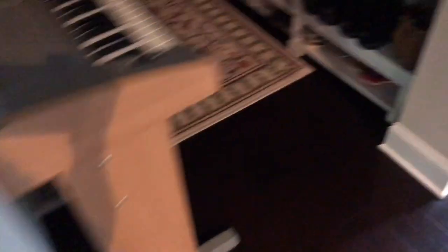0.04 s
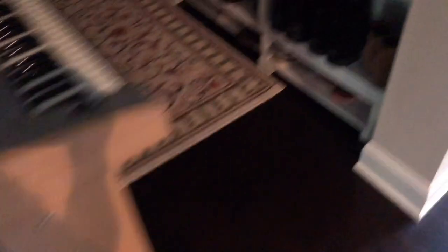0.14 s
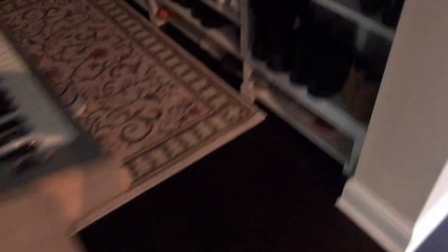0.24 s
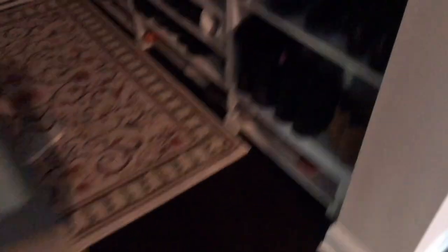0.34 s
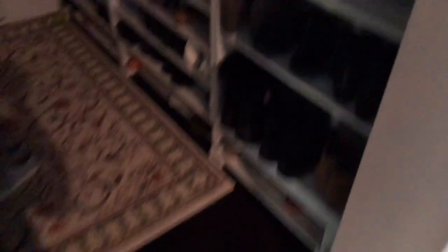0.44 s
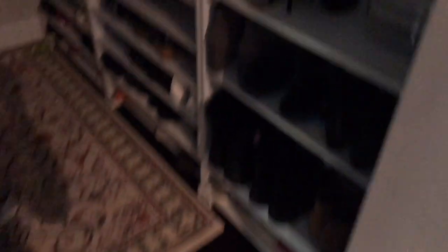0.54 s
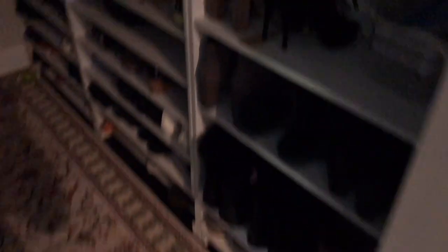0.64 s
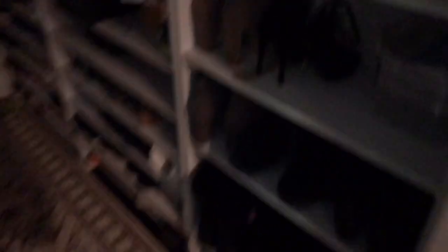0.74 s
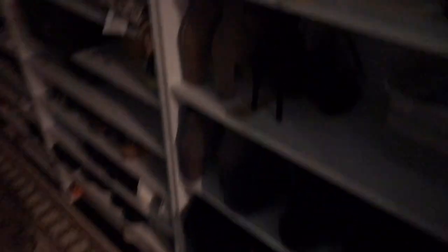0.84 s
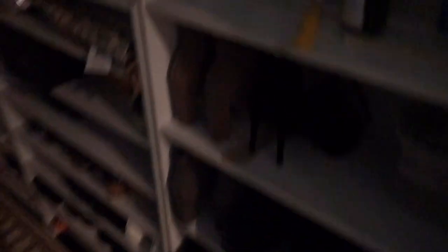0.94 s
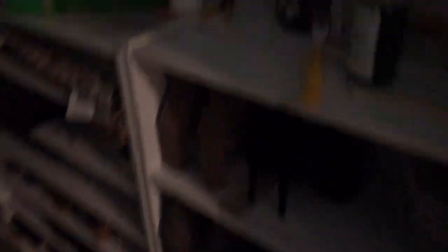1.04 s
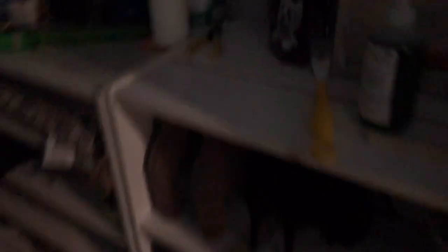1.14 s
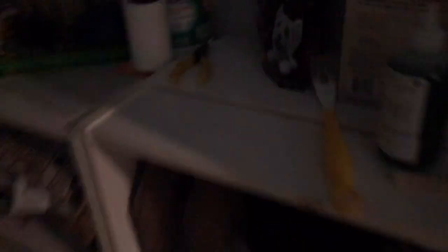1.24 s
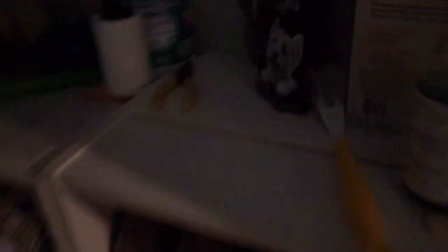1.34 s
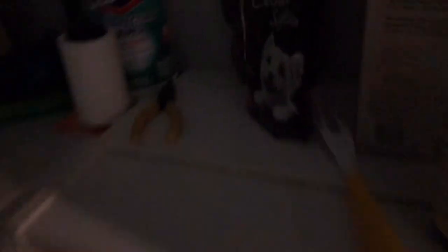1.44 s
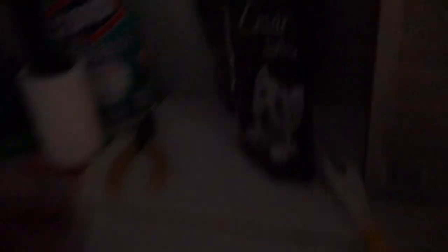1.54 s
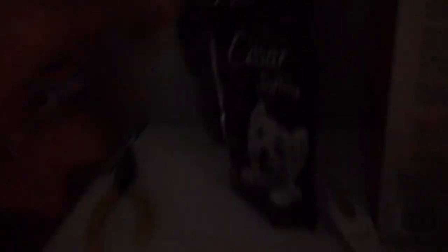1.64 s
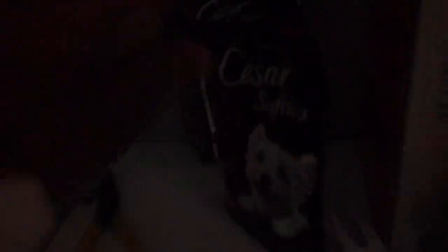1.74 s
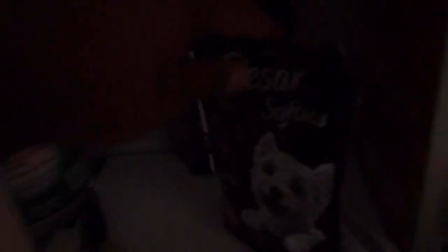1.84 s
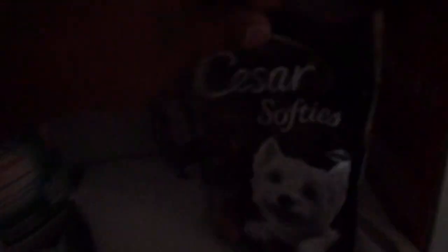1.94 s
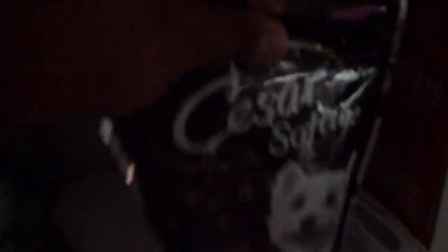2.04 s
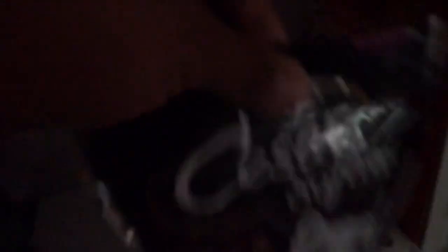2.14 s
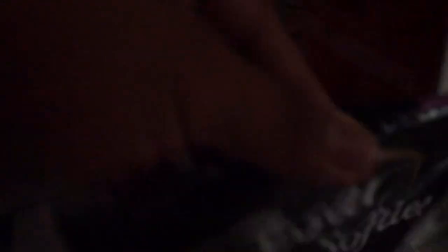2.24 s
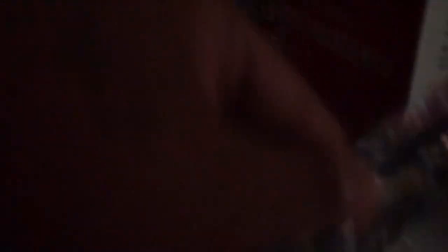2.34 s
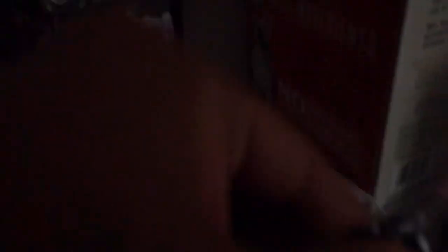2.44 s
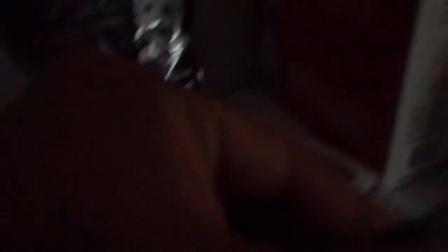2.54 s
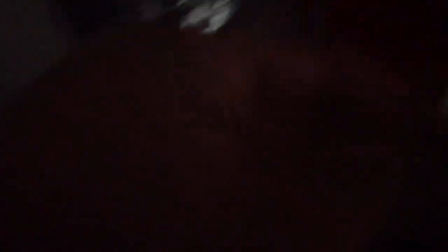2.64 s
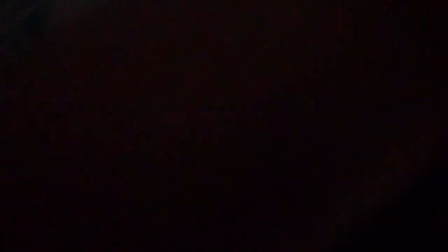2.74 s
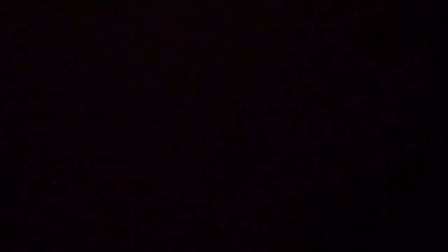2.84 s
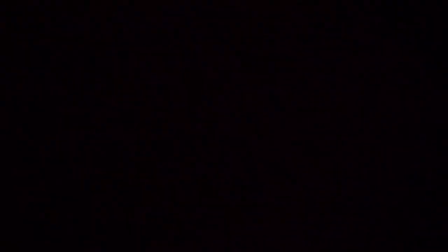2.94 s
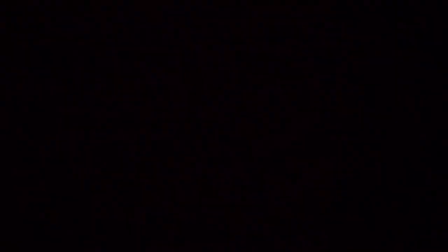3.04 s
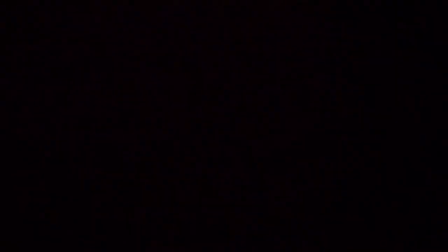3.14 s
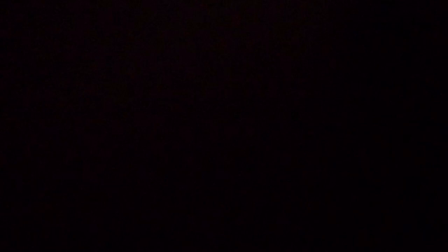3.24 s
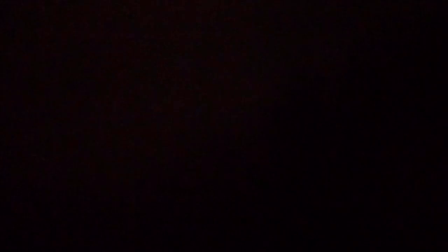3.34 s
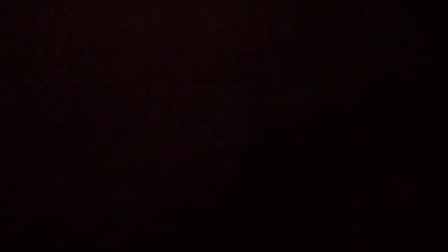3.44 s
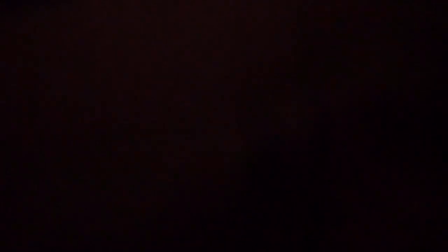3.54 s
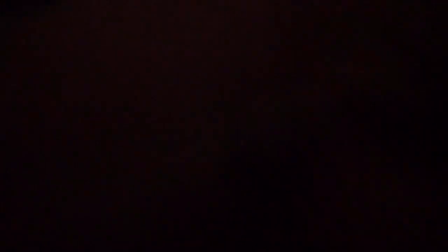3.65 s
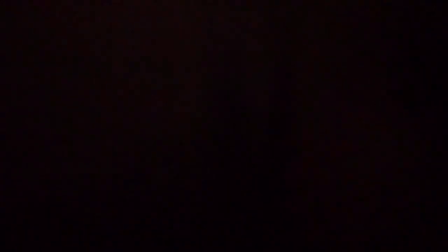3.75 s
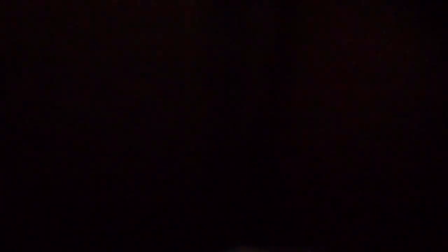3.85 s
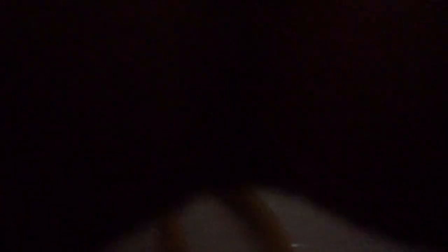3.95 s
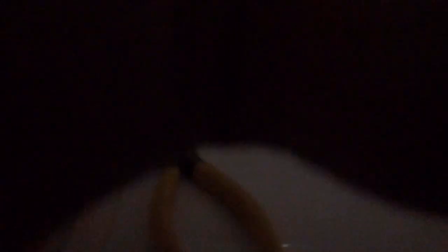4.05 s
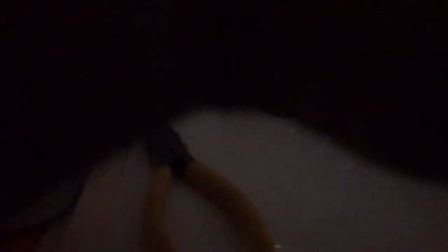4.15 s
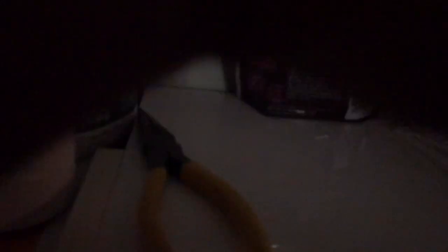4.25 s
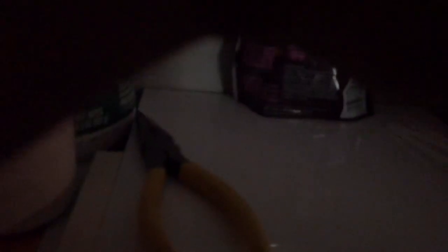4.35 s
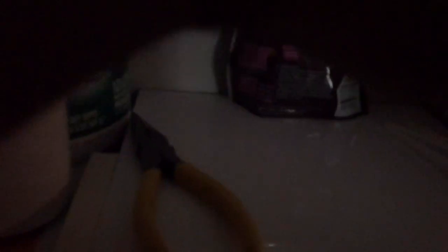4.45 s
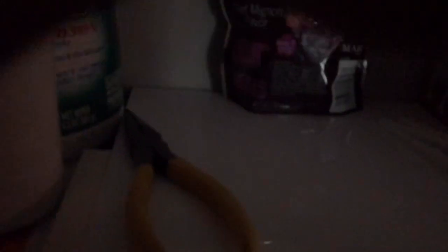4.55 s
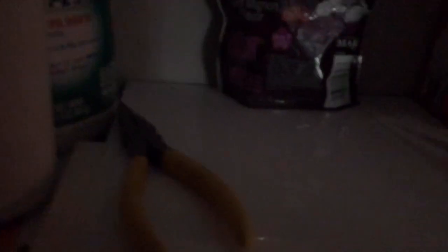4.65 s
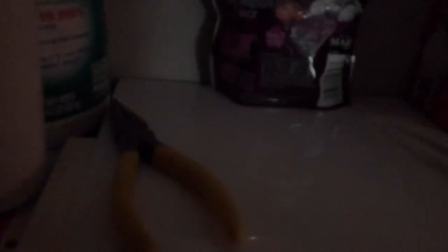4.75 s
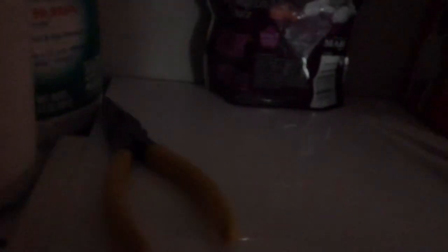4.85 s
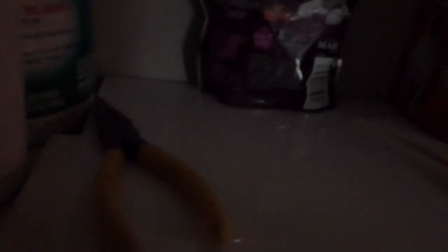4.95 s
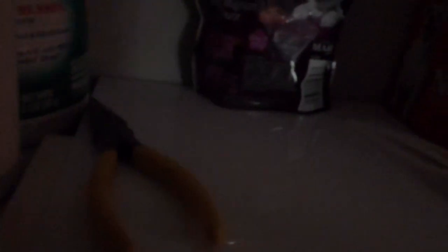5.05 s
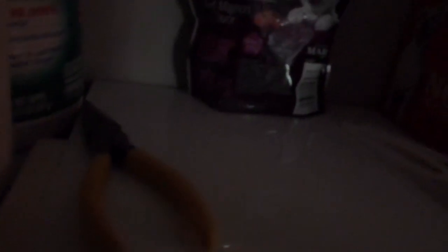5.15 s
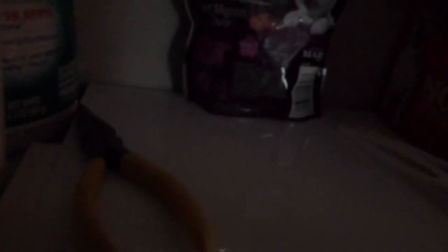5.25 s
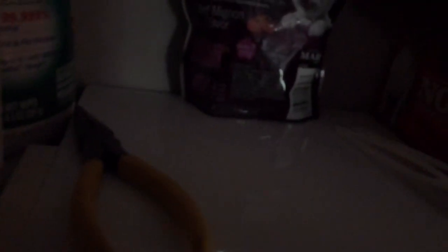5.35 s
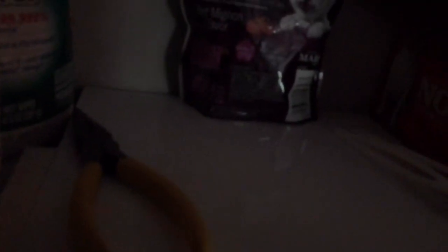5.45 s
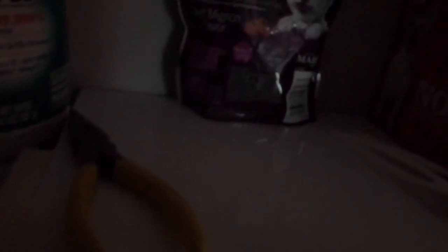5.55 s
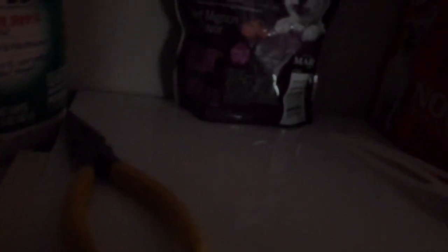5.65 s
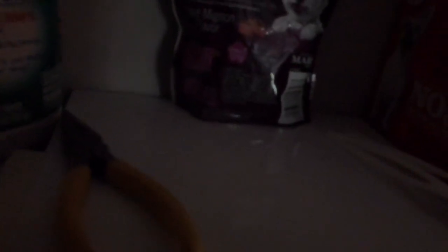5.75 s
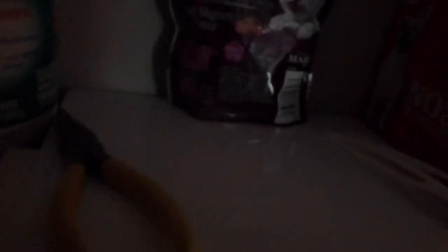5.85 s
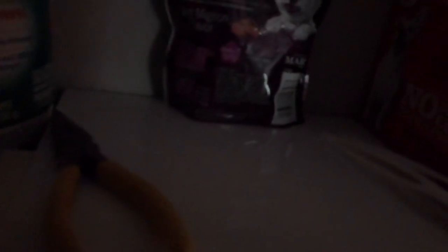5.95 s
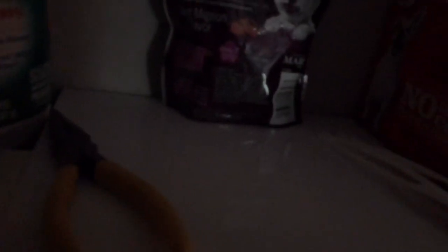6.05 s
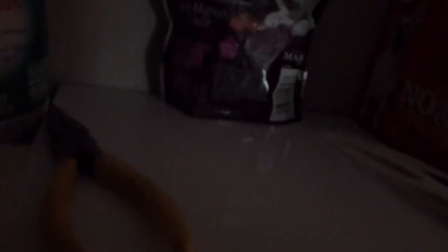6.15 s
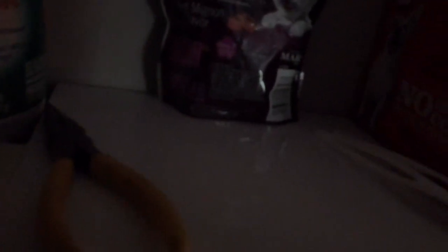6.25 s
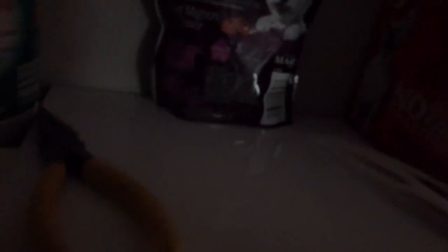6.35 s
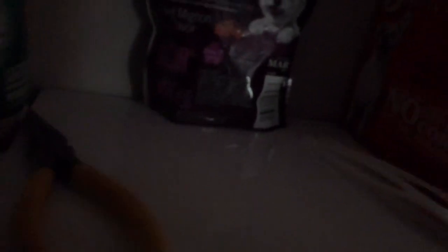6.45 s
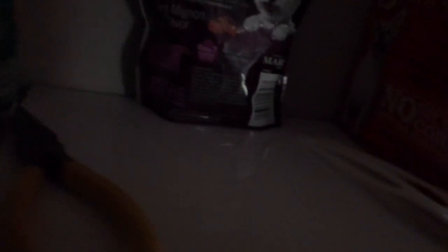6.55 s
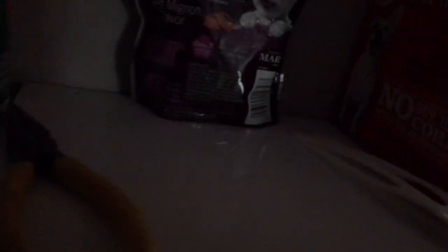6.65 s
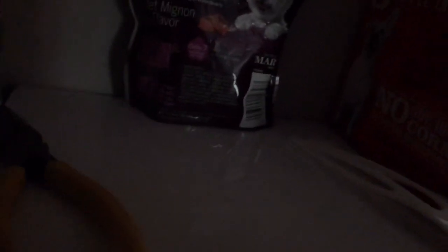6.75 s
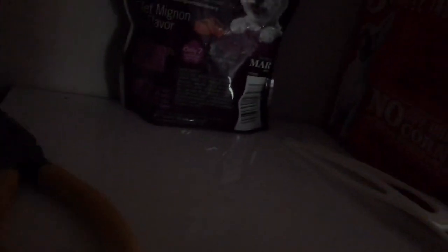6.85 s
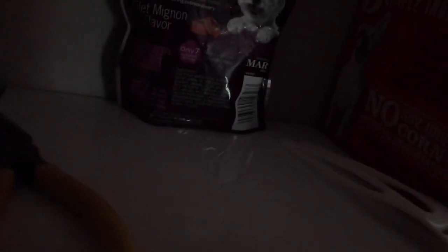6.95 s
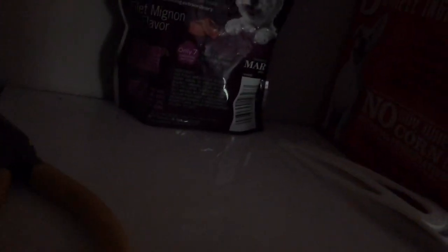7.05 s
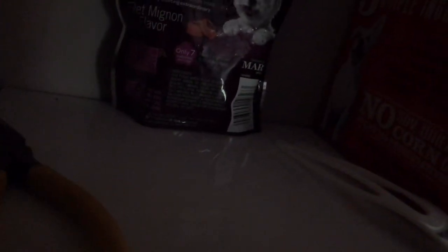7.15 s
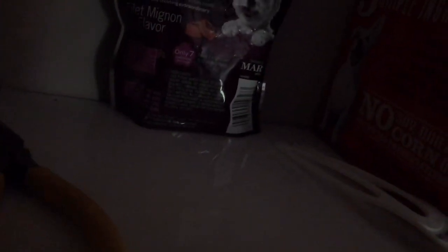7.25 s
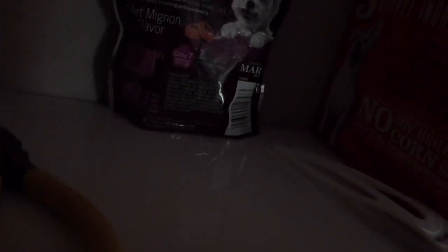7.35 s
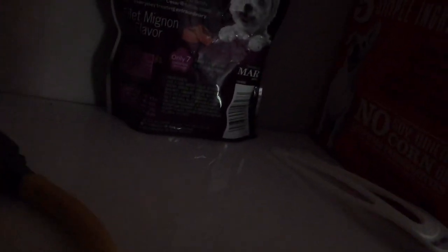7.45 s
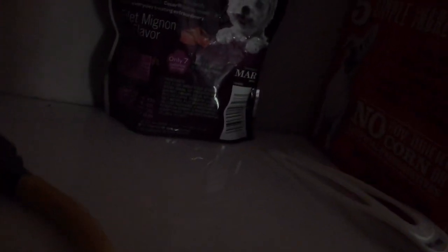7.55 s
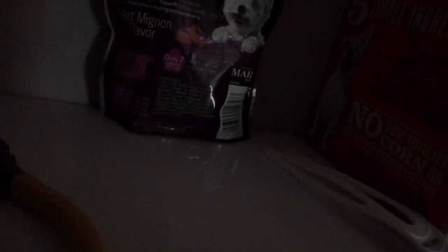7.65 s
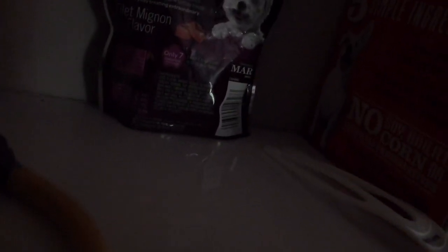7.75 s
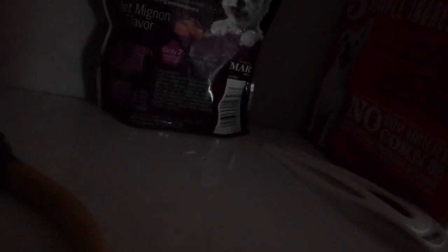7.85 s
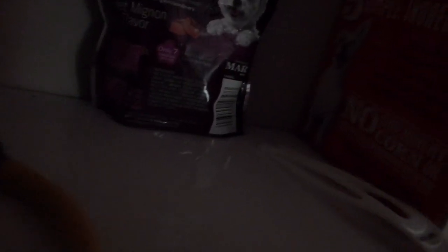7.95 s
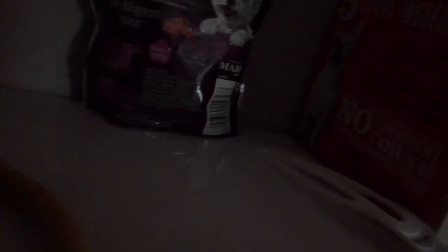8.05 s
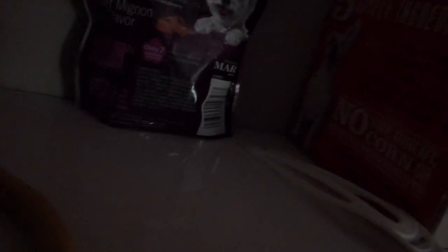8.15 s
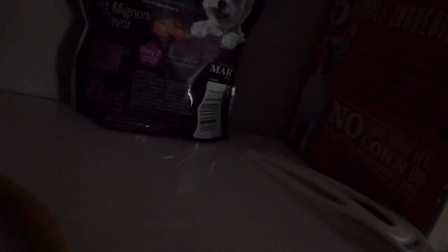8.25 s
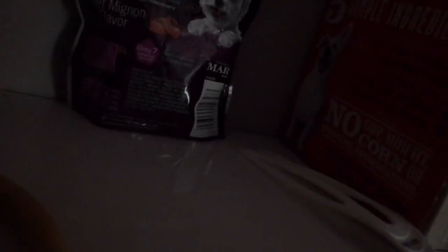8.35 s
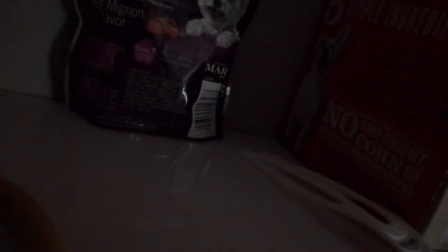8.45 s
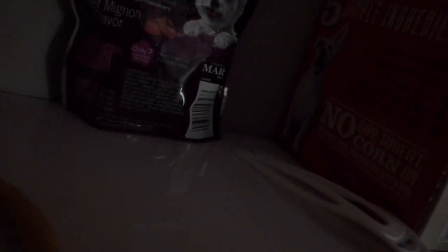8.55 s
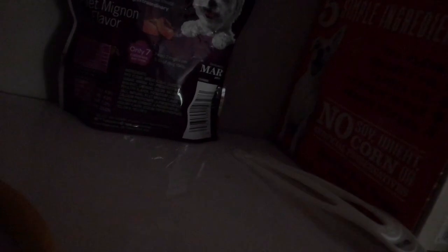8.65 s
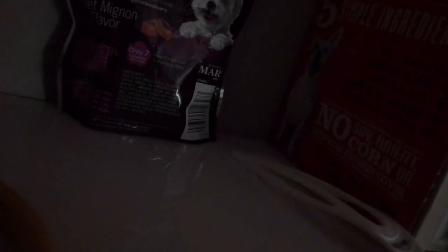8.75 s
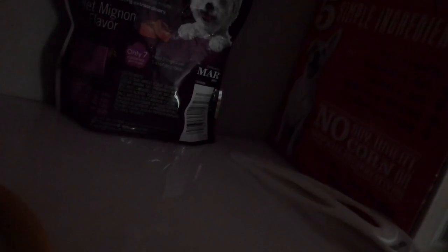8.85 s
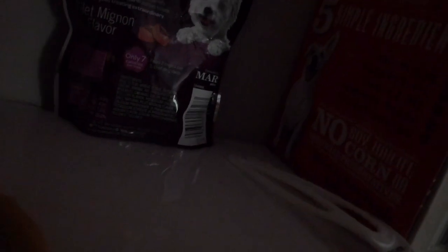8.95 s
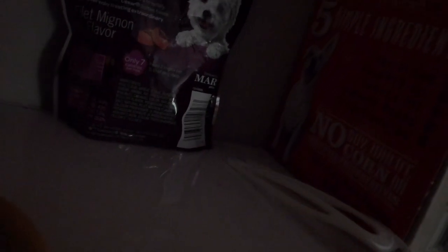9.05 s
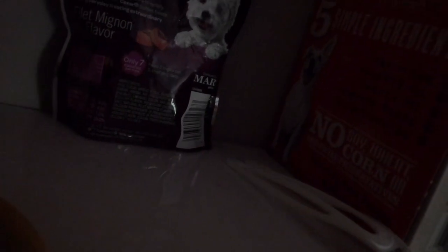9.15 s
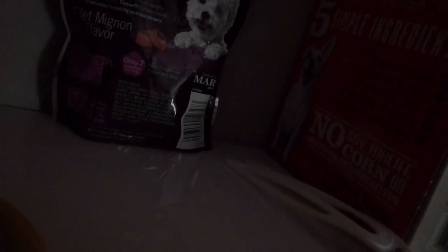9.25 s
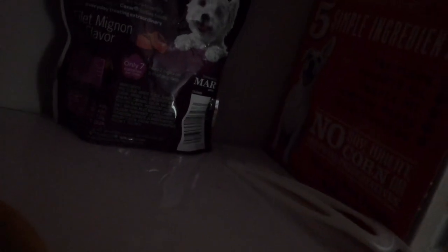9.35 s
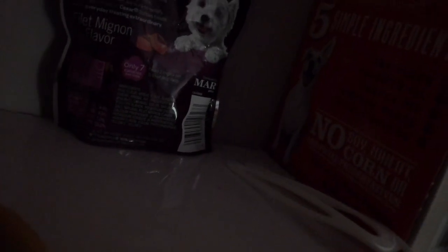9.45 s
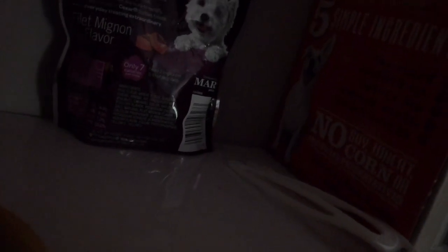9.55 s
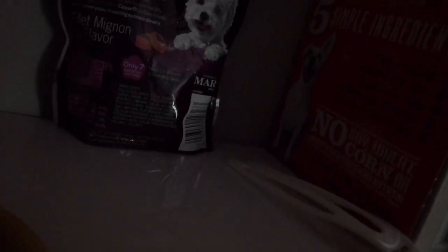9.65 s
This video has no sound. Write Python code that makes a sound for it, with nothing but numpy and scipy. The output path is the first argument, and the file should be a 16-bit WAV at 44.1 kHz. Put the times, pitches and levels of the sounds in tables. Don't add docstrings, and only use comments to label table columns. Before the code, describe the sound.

Quiet indoor air and one far slap, then close dense crinkling of a treat pouch, thinning to scattered crackles and soft bumps.

```python
import sys
import numpy as np
from scipy import signal
from scipy.fft import rfft, irfft, next_fast_len
from scipy.io import wavfile
from scipy.ndimage import uniform_filter1d, map_coordinates

SR = 44100
rng = np.random.default_rng(int(sys.argv[2]) if len(sys.argv) > 2 else 0)


def file_out(sig):
    cols = np.atleast_2d(sig).T
    lim = np.clip(cols, -1, 1)
    pcm = np.round(lim * 32767).astype(np.int16)
    wavfile.write(sys.argv[1], SR, pcm)


def level_to_linear(level):
    exponent = np.asarray(level, float) / 20
    return 10 ** exponent


N = 427769


def unit(x):
    return x / np.sqrt(np.mean(x ** 2, axis=-1, keepdims=True) + 1e-20)


def peak(x):
    return x / np.abs(x).max(axis=-1, keepdims=True)


def along(points, hz):
    f, v = np.transpose(points)
    return np.interp(np.log(hz + 1), np.log(f + 1), v)


def wobble(rate):
    knots = rng.standard_normal(int(N * rate / SR) + 4)
    return map_coordinates(knots, [np.arange(N) * rate / SR])


def filtered(x, response):
    m = next_fast_len(x.shape[-1] + 4096)
    return irfft(rfft(x, m) * response(np.fft.rfftfreq(m, 1 / SR)), m)[..., :x.shape[-1]]


def place(s, rows):
    where = np.round(s * SR).astype(int) + np.arange(rows.shape[1])
    return np.bincount(where.ravel(), rows.ravel(), N + rows.shape[1])[:N]


def resonance(f, hz, width_hz):
    return 1j * f * width_hz / (hz * hz - f * f + 1j * f * width_hz + 1e-9)


def tail(decays, seconds):
    hz, t, z = signal.stft(rng.standard_normal(int(seconds * SR)), SR, nperseg=128)
    decay = level_to_linear(-60 * t / along(decays, hz)[:, None])
    x = signal.istft(z * decay, SR, nperseg=128)[1]
    return x / np.linalg.norm(x)


def grains(per_second, clump_db):
    hit = rng.random(N) < per_second / SR
    uneven_db = 2 * np.minimum(rng.exponential(size=N), 3)
    size = level_to_linear(uneven_db + clump_db * (wobble(60) + wobble(12)))
    return unit(hit * size * rng.standard_normal(N))


def patchy(x, depth_db):
    z = signal.stft(x, nperseg=256)[2]
    field = uniform_filter1d(rng.standard_normal(z.shape), size=9, axis=0)
    field = uniform_filter1d(field, size=14, axis=1)
    return unit(signal.istft(z * level_to_linear(depth_db * field / field.std()), nperseg=256)[1][:N])


# f/Hz, density/(dB per Hz)
AIR_SPECTRUM = [(25, -16), (55, 5), (150, -2), (900, -14.5), (3000, -17), (8000, -24), (16000, -46.5)]
# t/s, level/dB, half length/s
STRIDES = [
    (.69, -68, 0.037),
    (0.86, -66, 0.11),
    (1.44, -63.5, 0.16),
]


def background():
    noise = rng.standard_normal((3, N))
    air = patchy(filtered(noise[0], lambda f: level_to_linear(along(AIR_SPECTRUM, f))), depth_db=1.2)
    rumble = unit(filtered(noise[1], lambda f: resonance(f, 53, 29) ** 2))
    cloth = unit(filtered(noise[2], lambda f: resonance(f, 11000, 25000)))
    t = np.arange(N) / SR
    brush = level_to_linear(-75.5) + sum(level_to_linear(db) * np.exp(-((t - s) / half) ** 2) for s, db, half in STRIDES)
    return level_to_linear(-62.5) * air + level_to_linear(-66.5) * rumble + brush * cloth


def hum():
    t = np.arange(N) / SR
    fade_s = 1.6
    level_db = -62 - 12 * (1 - np.exp(-t / fade_s)) + 1.5 * wobble(6.6)
    hz = 53.8 + 1.8 * wobble(5.6)
    return level_to_linear(level_db) * np.sin(2 * np.pi * np.cumsum(hz) / SR)


# f/Hz, density/(dB per Hz)
SLAP_SPECTRUM = [(35, -18.5), (70, 11.5), (110, -11.5), (200, 0), (330, -9), (3500, -13), (8000, -13.5),
                 (16000, -7.5)]
# f/Hz, bandwidth/Hz, level/dB
SLAP_MODES = [
    (530, 135, 2.5),
    (1350, 58, 4.5),
    (2300, 190, -6),
    (7800, 1600, -9.5),
]
# f/Hz, decay by 60 dB/s
HALL_DECAY = [(70, 1), (1400, 1.23), (7000, 0.87), (15000, 0.37)]


def slap():
    ring = np.zeros(N + 2 * SR)
    for s, db in [(.081, -3.5), (.222, -10.5)]:
        decay = tail(HALL_DECAY, 1.7)
        t = np.arange(len(decay)) / SR
        onset = (1 - np.exp(-t / 0.011)) * (1 + 0.9 * np.exp(-t / 0.0086))
        ring[round(s * SR):][:len(t)] += level_to_linear(db) * decay * onset
    modes = lambda f: 1 + sum(level_to_linear(db + 5) * np.abs(resonance(f, hz, w)) for hz, w, db in SLAP_MODES)
    late = lambda f: np.exp(-2j * np.pi * f * 0.026 / (1 + (f / 300) ** 2))
    body = unit(filtered(ring[:N], lambda f: late(f) * modes(f) * level_to_linear(along(SLAP_SPECTRUM, f))))
    start_s, length_s = .088, .018
    t = np.arange(N) / SR - start_s
    gate = np.clip(t / .003, 0, 1) * np.exp(-np.clip(t - length_s, 0, 1) / .008)
    spray = unit(filtered(grains(9000, clump_db=-0.5), lambda f: resonance(f, 10000, 9000)))
    return level_to_linear(-49.5) * body + level_to_linear(-30) * gate * spray


# f/Hz, bandwidth/Hz, level/dB
POUCH_MODES = [
    (144, 90, 1.5),
    (330, 170, -1.5),
    (480, 86, 1.5),
    (833, 240, -28.5),
]


def pouch(f):
    modes = sum((-1) ** k * level_to_linear(db) * resonance(f, hz, w) for k, (hz, w, db) in enumerate(POUCH_MODES))
    return modes * 1j * f / (150 + 1j * f)


def crease(f, hz, skirt=0.52):
    colour = resonance(f, hz, 0.21 * hz) + skirt * resonance(f, .5 * hz, 1.8 * hz)
    return colour / (1 - (f / hz / 2) ** 2 + 1j * f / hz / 0.88)


def panels(rows, depth_db):
    ripple = unit(uniform_filter1d(rng.standard_normal((rows, 220)), size=7))
    return lambda f: level_to_linear(depth_db * ripple[:, (f // 101).astype(int)])


def snaps(rows, skirt):
    s, db, hz, ms, thump_db, top_db = np.transpose(rows)[:, :, None]
    thump_db = thump_db - 0.24 * (db + 24.5)
    t = np.arange(2560) / SR / (np.clip(ms, 1, 20) / 1000)
    envelope = (1 - np.exp(-t / 0.072)) * (np.exp(-1.6 * t ** 2) + 0.13 * np.exp(-.8 * t))
    head = np.arange(2560) / SR * 1000 / .45
    envelope = envelope + 0.94 * head * np.exp(1 - head)
    slips = rng.standard_normal((3, len(s), 2560)) * envelope
    ripple = panels(len(s), depth_db=2.5)
    late = lambda f: np.exp(-1j * 4 * np.pi * 0.042 * (np.sqrt(f + 60) - f / 200))
    body = filtered(slips[0], lambda f: ripple(f) * np.exp(-1j * 4 * np.pi * 0.042 * (np.sqrt(f + 60) - f / 200))
                 * crease(f, hz, skirt))
    late_rippled = lambda f: late(f) * ripple(f)
    top = filtered(slips[1], lambda f: late_rippled(f) * resonance(f, 8900, 23000) ** 2)
    thump = filtered(slips[2], lambda f: late_rippled(f) * pouch(f))
    mix = peak(body) + level_to_linear(top_db - 2.5) * peak(top) + level_to_linear(thump_db - 5.0) * peak(thump)
    return place(s, level_to_linear(db - 1.5) * mix)


# t/s, level/dB, f/Hz
TICKS = [(0.872, -50, 9000), (1.8812, -23.5, 12100), (2.0698, -17, 3180), (2.2293, -26, 8890),
         (2.486, -30, 9600), (2.5422, -37.5, 7800.0), (2.751, -21, 3700), (4.0696, -31, 9660),
         (4.3317, -36, 1680), (4.3918, -36, 6000.0), (4.707, -37, 4330), (4.7723, -36, 13000.0),
         (5.0386, -31, 6050), (5.0552, -38, 6420.0), (5.4316, -31.5, 4100), (2.6133, -24, 8470),
         (3.8083, -30, 2870), (4.1956, -38.5, 6040), (4.2092, -35.5, 8500), (4.5124, -29, 5940),
         (5.402, -36.5, 11800), (5.5466, -36, 12500), (5.9804, -42, 6400),
         (6.4514, -27.5, 7200), (8.558, -48, 5000), (9.186, -44, 8000), (7.149, -48.5, 5070),
            (6.073, -45, 7800), (6.0956, -35, 12080.0), (6.237, -32, 8250), (6.326, -32, 12630.0),
            (6.7074, -37, 3860), (6.743, -39.5, 2440), (6.859, -34.5, 6440), (7.299, -24.5, 6940),
            (7.324, -30.5, 5160), (7.3456, -34, 3100), (7.398, -29.5, 12800), (7.528, -36.5, 7800),
            (7.5677, -32.5, 8200), (7.8368, -36, 11400.0), (7.914, -32.5, 5100.0), (7.9807, -34, 10200),
            (8.155, -35, 4560), (8.3761, -32.5, 3800), (8.9031, -33, 6170), (8.9534, -29.5, 4130),
            (9.152, -41.5, 6000), (9.5279, -34.5, 3900), (9.582, -30, 6000)]
# t/s, level/dB, f/Hz, length/ms
CRISP = [(1.8514, -24.5, 4100, 6.9), (1.873, -25, 6150, 3.7), (1.914, -6, 9900, 1.5),
         (1.96, -18, 3880, 7.8), (1.992, -17, 3780, 12.5), (2.0204, -20.5, 13000, 3.4),
         (2.0296, -17.5, 9000, 6.8), (2.12, -19.5, 5460, 3.3), (2.179, -16, 1610, 4.9),
         (2.3388, -7.5, 5650, 3.9), (2.365, -12.5, 5400, 5.7), (2.635, -15.5, 8400, 5.2),
         (3.1094, -3, 3870, 2), (3.119, -3, 2640, 3.2), (3.619, -14, 6660, 4.2), (4.032, -24.5, 4400, 5.8),
         (4.094, -27, 6860, 6.4), (4.4333, -21, 6500, 1.5), (4.459, -18, 6100, 1.2),
         (4.527, -32, 7800, 10.5), (5.738, -4, 3370, 3.1), (7.7364, -30, 4230, 7.6),
         (8.084, -20, 12300, 3.6), (8.3218, -17.5, 3450, 5.5), (8.792, -17.5, 5820, 5.1),
         (8.977, -30, 3190, 7.4), (9.612, -26.5, 5830, 3.2)]
# t/s, level/dB, f/Hz, length/ms
DULL = [(1.9048, -27, 1670, 18), (1.9359, -19, 1610, 5.7), (1.9525, -19, 2350, 6.6),
        (2.3548, -7.5, 5800, 2.3), (2.418, -20.5, 1780, 9.5), (2.439, -18, 3820, 3.3),
        (2.5953, -19, 2420, 3.5), (2.8506, -15.5, 1460, 8.7), (2.946, -10.5, 2180, 20.5),
        (3.024, -5.5, 3350, 7.3), (3.033, -15.5, 3900, 30), (3.1853, -26, 1750, 5.6),
        (3.4015, -24.5, 2100, 1.1), (3.446, -34, 3320, 1), (3.507, -24, 3350, 8), (3.898, -29, 5200, 5.8),
        (3.932, -30.5, 1900, 3.9), (4.3487, -20.5, 3700, 3.6), (4.4688, -10.5, 6700, 0.63),
        (5.25, -19.5, 1730, 8.1), (6.1314, -15, 6000, 8.3), (6.521, -22.5, 13400, 4.6),
        (6.95, -21, 5700, 4.6)]
# t/s, level/dB, f/Hz, length/ms
DRY = [
    (2.463, -15, 1250, 4.5),
    (2.572, -16.5, 2270, 8.7),
    (2.6756, -17, 1970, 6.2),
    (2.6859, -1.5, 4700, 2),
    (2.8075, -5.5, 5230, 9.7),
    (3.4684, -5, 9600, 0.71),
    (3.9444, -12, 7100, 1.3),
    (4.082, -24.5, 4680, 2.9),
    (6.3056, -23, 10000, 4),
]
# t/s, level/dB, f/Hz, length/ms
FLIPS = [(2.0459, -15.5, 4700, 6.6), (2.0896, -20.5, 1630, 6.8), (2.2355, -15.5, 5700, 5),
         (2.32, -25.5, 3950, 5.1), (2.427, -20, 5000, 3.8), (2.7275, -12, 4360, 13),
         (2.7567, -17, 2290, 8.7), (4.453, -21.5, 4360, 8.3), (4.5958, -37, 1620, 20),
         (5.7824, -18.5, 1130, 7.5), (6.375, -28, 2760, 6.9), (7.7932, -26, 5230, 1.9),
         (8.1277, -24.5, 3600, 7.7), (8.2061, -23.5, 12600, 3.2), (9.3544, -26, 3910, 13.3)]
# t/s, level/dB, f/Hz, length/ms
BUCKLES = [(2.0772, -28, 2190, 6.4), (2.5185, -18, 4570, 4.7), (2.998, -10.5, 4640, 3.9),
           (3.065, -9, 1960, 4.3), (3.2242, -23.5, 910, 5.5), (3.7146, -15, 1520, 8),
           (3.7485, -25.5, 2040, 2.5), (4.8323, -13, 4830, 4.8), (5.3042, -32.5, 1930, 11),
           (5.489, -28.5, 1490, 4.6), (5.716, -10, 3960, 5.7), (5.8308, -16.5, 2600, 5.8),
           (6.1135, -17.5, 1470, 11.5), (7.8607, -15.5, 1140, 6.8), (7.881, -23.5, 1210, 12),
           (8.6668, -30.5, 6410, 6.1), (9.314, -26, 1640, 6), (9.4517, -32, 1070, 9.2)]
# thump level/dB, top-end level/dB
BUILD = [
    (-16.5, 1),
    (-16.5, -20),
    (-39.5, -7.5),
    (-2.5, 1),
    (-3, -30.5),
    (-24, -1),
]


def creases():
    ticks = [(*row, 4.6) for row in TICKS]
    kinds = zip([CRISP, DULL, DRY, FLIPS, BUCKLES, ticks], BUILD)
    return snaps([(*row, *build) for rows, build in kinds for row in rows], skirt=0.37)


# f/Hz, density/(dB per Hz)
FILM_SPECTRUM = [(600, 7.5), (1200, 7), (5000, 1.5), (15000, -20.5)]
# t/s, level/dB
EFFORT = [(1.91, -54.5), (2.0, -44), (2.3, -49.5), (2.9, -43), (3.06, -54), (3.24, -57.5), (3.41, -52),
          (3.56, -65.5), (3.75, -55), (4.58, -57.5), (4.9, -67.5), (5.6, -57.5), (5.99, -65), (6.18, -50.5),
          (7.21, -66.5), (7.8, -50.5), (8.45, -64.5), (9.6, -56.5)]


def rubbing(snapped):
    t = np.arange(N) / SR
    hand_db = np.interp(t, *np.transpose(EFFORT))
    sinks_db = 1.5 * (t - 2)
    rustle_db = 2.5 - 61.0 + 1.49 * (hand_db + 55.5) - sinks_db
    hiss_db = -66.5 + 0.69 * (hand_db + 56) - sinks_db
    touching = np.arange(N) > 1.848 * SR
    rustle = patchy(filtered(grains(6000, clump_db=2), lambda f: level_to_linear(along(FILM_SPECTRUM, f))), depth_db=3.5)
    burst = np.convolve(np.abs(grains(120, clump_db=.7)), np.exp(-np.arange(300) / 40))[:N]
    stray = filtered(burst * rng.standard_normal(N), lambda f: resonance(f, 6000, 12000))
    rustle = rustle + .1 * patchy(stray, depth_db=4)
    rocking = unit(filtered(grains(300, clump_db=1.6), pouch))
    hiss = patchy(filtered(grains(9000, clump_db=1), lambda f: resonance(f, 11000, 14000)), depth_db=2)
    shiver_s, shiver_growth = 0.056, 0.86
    fade = np.exp(-1 / (shiver_s * SR))
    snap_power = np.abs(signal.lfilter([1 - fade], [1, -fade], snapped ** 2))
    shiver = np.sqrt(snap_power) ** shiver_growth * level_to_linear(-5)
    rustle_gain = level_to_linear(rustle_db) + level_to_linear(-24.5) * shiver
    rocking_gain = level_to_linear(-3.5) * (level_to_linear(hand_db) + level_to_linear(-25.5) * shiver)
    return touching * (rustle_gain * rustle + rocking_gain * rocking + level_to_linear(hiss_db) * hiss)


# t/s, length/ms, level/dB, f/Hz
DRAGS = [(1.902, 83, -23, 1630), (2.063, 34, -27, 2020), (2.717, 27, -28, 3990), (2.85, 13.4, -1.5, 1420),
         (2.862, 89, -22, 6400), (2.904, 49, -14.5, 2230), (3.6, 28, -25.5, 8000), (3.671, 74, -32, 1900),
         (4.026, 60, -34.5, 1850), (4.753, 23, -36, 6000), (6.349, 43, -31, 2280),
         (6.591, 6.7, -24.5, 5600), (7.294, 230, -49.5, 5510), (8.083, 160, -45.5, 5000),
         (8.311, 63, -37.5, 4100), (8.938, 87, -46, 3120), (9.353, 70, -43.5, 3870),
         (9.455, 23, -37.5, 900), (9.67, 54, -34.5, 2000)]
# t/s, length/ms, level/dB, f/Hz
WIPES = [(2.333, 65, -31, 5770), (2.413, 30, -22, 1920), (3.024, 49, -9, 3870), (3.31, 92, -25, 3450),
         (4.85, 80, -47, 3500), (6.2, 42, -46, 2520), (3.068, 16, -20, 9000), (5.58, 110, -45, 2500),
         (3.411, 43, -35, 2000), (4.445, 38, -28, 6200), (4.541, 99, -32.5, 1520), (5.162, 53, -34.5, 2300),
         (5.251, 95, -36.5, 1660), (6.118, 23, -22, 7800), (6.43, 58, -37, 7300), (7.466, 31, -32, 6500),
         (7.58, 23, -29.5, 2840), (7.862, 56, -40, 1340), (8.63, 60, -41.5, 6400)]


def drags():
    open_hiss_db, palm_hiss_db = -3.5, -21
    rows = [(*row, open_hiss_db) for row in DRAGS] + [(*row, palm_hiss_db) for row in WIPES]
    start, ms, db, hz, top_db = np.transpose(rows)[:, :, None]
    length = ms / 1000
    t = np.arange(6144) / SR - .01
    rise = np.clip(100 * t + 1, 0, 1) / (1 + np.exp(-t / 0.007))
    stop = np.exp(-.35 * t / length) / (1 + np.exp((t - length) / 0.0076))
    chance = rng.standard_normal((3, len(db), 6144))
    clumps = level_to_linear(3.5 * unit(uniform_filter1d(chance[2], size=90)))
    ripple = panels(len(db), depth_db=2)
    colour = lambda f: ripple(f) * (crease(f, hz, skirt=0.84) + 0.6 * crease(f, 3400))
    body = unit(filtered(chance[0] * clumps, colour))
    top = unit(filtered(chance[1] * clumps, lambda f: resonance(f, 7600, 16000) ** 2))
    return place(start - .01, level_to_linear(db - 13.0) * rise * stop * (body + level_to_linear(top_db) * top))


# t/s, level/dB, f/Hz
SLIPS = [(1.9644, -19, 11000), (2.2044, -33, 9000), (2.4165, -28, 9500), (2.514, -32, 9000),
         (2.5264, -26, 8000), (3.0197, -27, 10000), (3.036, -10, 4020), (3.0445, -8, 3840),
         (3.0492, -7.5, 3980), (3.061, -18, 6000), (8.3125, -36, 6500), (3.6087, -24, 8000),
         (8.678, -40, 6500), (7.411, -39, 4500), (4.0497, -38, 7000), (4.6243, -45, 10000),
         (4.66, -50, 8000), (4.684, -49, 5500), (6.231, -35, 6000), (6.355, -30.5, 2300),
         (6.3653, -30, 1950), (6.3997, -35.5, 6500)]


def slips():
    return snaps([(*row, 3, -30, -14) for row in SLIPS], skirt=0.35)


# t/s,
# level/dB, f/Hz
WRINKLES = [(2.1726, -45, 1500), (2.4076, -32, 11500), (2.496, -38, 7800), (2.5043, -44, 7800),
            (2.5804, -27, 11500), (3.6978, -30, 1500), (3.7788, -42, 7800), (3.834, -55, 3500),
            (3.8582, -38, 3500), (3.873, -54, 11500), (3.9212, -45, 11500), (3.9684, -33, 7800),
            (4.1485, -50, 7800), (4.2394, -42, 3480), (4.4127, -35, 7800), (4.4254, -37, 1500),
            (4.4462, -32, 5200), (4.4539, -35, 3500), (4.5965, -27, 11500), (4.7961, -46, 11500),
            (4.8702, -45.5, 3500), (4.9427, -47, 11500), (4.9646, -47, 7800), (5.1383, -49, 11360),
            (5.1524, -48, 7800), (5.2369, -50, 11500), (5.3796, -51, 1500), (5.4697, -45, 3500),
            (5.5916, -42, 11500), (5.6488, -40, 11500), (5.6659, -39, 11500), (5.6724, -41, 11500),
            (5.6835, -44, 11500), (5.7075, -48, 11650), (5.9074, -48, 7800), (5.9449, -49, 11500),
            (6.2287, -36, 7800), (6.6693, -43, 7800), (6.7357, -39, 11550), (6.7517, -41, 11500),
            (6.8247, -42, 3530), (6.9347, -52, 5200), (7.3347, -41.5, 11400), (7.4782, -40, 7800),
            (7.4888, -37, 3480), (7.5611, -44, 11500), (7.6315, -56, 1500), (7.6985, -41, 3500),
            (7.7508, -39.5, 11500), (7.7749, -31, 11500), (7.8433, -43, 11500), (7.8877, -29, 2320),
            (7.9299, -39, 11500), (7.9649, -50, 7800), (8.0083, -45, 7800), (8.1118, -42, 2280),
            (8.2915, -43, 11400), (8.6069, -53.5, 11640), (9.0689, -52, 11500),
            (2.2357, -20, 1600), (2.686, -14, 2140), (3.47, -13.5, 2200), (5.2512, -18.5, 5670),
           (5.2523, -16.5, 4050), (8.7925, -16.5, 5800), (2.7295, -11, 9000), (2.7358, -14.5, 4000),
           (2.808, -5.5, 9200), (2.81, -13.5, 2180), (3.0248, -4, 5900), (1.9973, -21, 2960),
           (2.0729, -19.5, 2500), (2.5215, -16.5, 2990), (4.8323, -21, 1900), (7.737, -19.5, 12900),
           (9.611, -32.5, 1310), (3.9455, -20.5, 10300)]


def wrinkles():
    fine_ms, skirt = 1.4, 0.14
    small = [(*row, fine_ms, -44.5, -15) for row in WRINKLES]
    creak = []
    for k in range(12):
        s = 3.4018 + k * .0052 + rng.normal(0, .0005)
        db = -33 + k * .1 + rng.normal(0, 2)
        creak.append((s, db, 2300, fine_ms, -40, -3))
    return snaps(small + creak, skirt)


def knocks(rows):
    s, db, hz = np.transpose(rows)[:, :, None]
    cycles = np.arange(4096) / SR * hz
    push = cycles * np.exp(-cycles / 1.05) * rng.standard_normal((len(s), 4096))
    modes = lambda f: (resonance(f, hz, 0.13 * hz) + 0.46 * pouch(f)) * resonance(f, hz, 2 * hz)
    return place(s, level_to_linear(db) * peak(filtered(push, modes)))


# t/s, level/dB, f/Hz
TREATS = [(2.035, -32.5, 600), (2.055, -30, 255), (2.075, -25.5, 690), (3.618, -32.5, 494),
          (4.205, -44.5, 170), (4.293, -38.5, 172), (4.975, -54, 171), (5.117, -45, 145), (5.283, -44, 500),
          (5.651, -44, 231), (5.675, -41.5, 198), (5.934, -40.5, 223), (6.04, -48, 450), (6.26, -49, 160),
          (6.79, -40.5, 165), (6.955, -43, 162), (7.085, -49, 399), (7.34, -51, 353), (7.37, -48, 161),
          (7.597, -42.5, 198), (7.632, -48, 398), (8.325, -43, 200), (8.385, -48.5, 80.4), (8.41, -46, 450),
          (8.66, -35.5, 487), (8.885, -51, 450), (9.166, -46.5, 525), (9.225, -44, 309), (9.47, -37.5, 198),
          (9.582, -47, 168), (9.63, -42, 188), (9.66, -38, 180)]


def treats():
    return knocks(TREATS)


# t/s, length/s, level/dB, f/Hz
SQUEAKS = [
    (2.077, .15, -44, 333),
    (4.22, 0.1, -76, 9600),
    (4.9, 0.094, -76, 4660),
    (7.03, 0.1, -71.5, 2880),
    (9.02, 0.25, -73, 4570),
]


def squeaks():
    start, length, db, hz = np.transpose(SQUEAKS)[:, :, None]
    phase = np.clip(np.arange(SR // 2) / SR / length, 0, 1)
    narrow = lambda f: resonance(f, hz, np.maximum(.03 * hz, 14)) ** 2
    whistle = unit(filtered(rng.standard_normal(phase.shape), narrow))
    return place(start, level_to_linear(db) * np.sqrt(np.abs(np.sin(np.pi * phase))) * whistle)


# t/s, level/dB, f/Hz
KNOCKS = [(2.145, -38, 375), (2.422, -37, 158), (2.494, -43, 366), (2.669, -33.5, 142), (8.655, -35.5, 183),
          (2.859, -37, 140), (3.014, -24.5, 101), (3.074, -27, 87.5), (3.22, -31, 217), (3.368, -46, 330.0),
          (3.454, -42, 360), (8.509, -39.5, 253.4), (4.167, -35, 385), (4.297, -37.5, 690),
          (5.233, -43, 418), (8.211, -30.5, 330), (5.327, -40, 573), (5.786, -52, 170), (3.068, -17.5, 370),
          (6.118, -25.5, 152), (6.16, -32.5, 380), (6.21, -41, 355), (6.368, -37, 480.0), (6.785, -32, 580),
          (7.58, -37.5, 685), (7.701, -38, 453), (7.864, -25, 149), (8.14, -27, 253), (9.362, -26.5, 286)]


def more_knocks():
    return knocks(KNOCKS)


# f/Hz, decay by 60 dB/s
CLOSET_DECAY = [(200, 0.4), (3000, 0.072), (12000, 0.16)]


def closet_echo(bag):
    return level_to_linear(-15.5) * signal.fftconvolve(np.pad(bag, (130, 0)), tail(CLOSET_DECAY, .3))[:N]


def scene():
    room = background() + hum() + slap()
    snapped = creases()
    bag = snapped + rubbing(snapped) + drags() + wrinkles() + treats() + squeaks() + more_knocks()
    return (room + bag + slips() + closet_echo(bag))[None]


def low_pass(x):
    return signal.sosfilt(signal.butter(12, 17150, fs=SR, output="sos"), x)


def record(dry):
    bass_cut = lambda f: (1j * f / (38 + 1j * f)) ** 3
    top_cut = lambda f: 0.05 + 1 / (1 + (f / 15850) ** 300)
    return low_pass(filtered(dry, lambda f: bass_cut(f) * top_cut(f)))


dry = scene()
out = record(dry)
file_out(out)
```